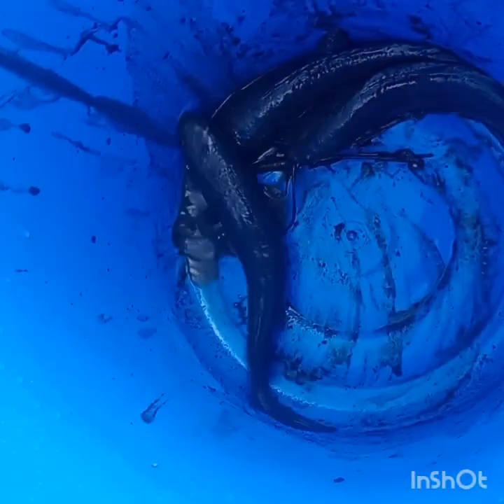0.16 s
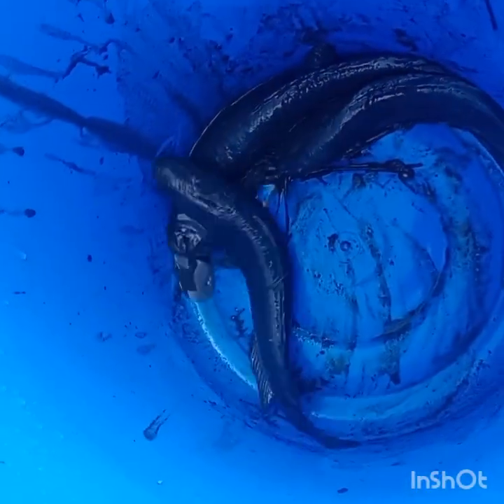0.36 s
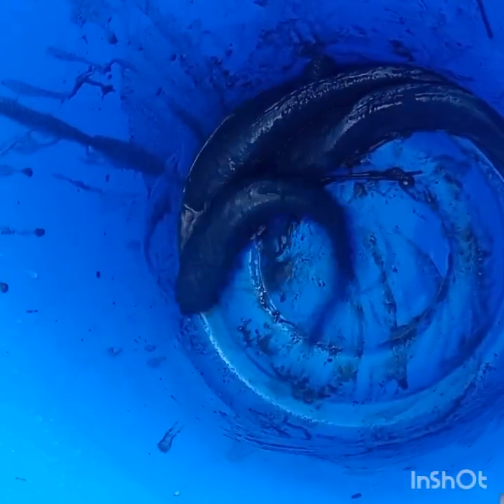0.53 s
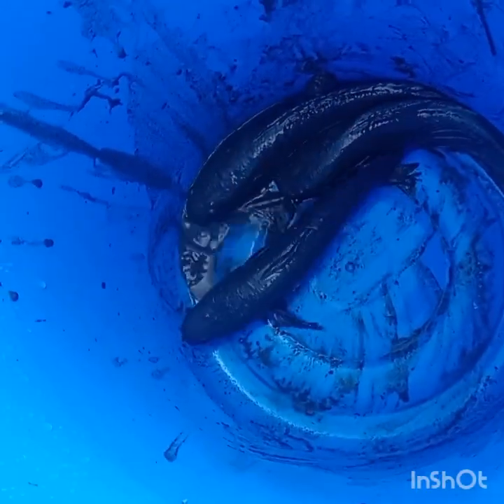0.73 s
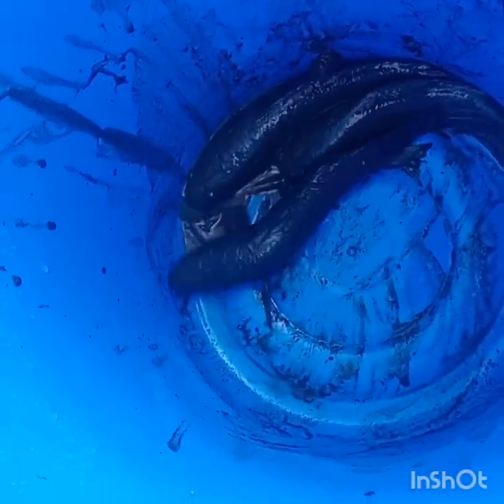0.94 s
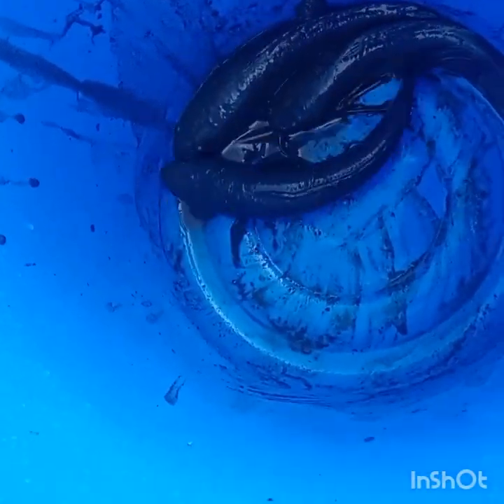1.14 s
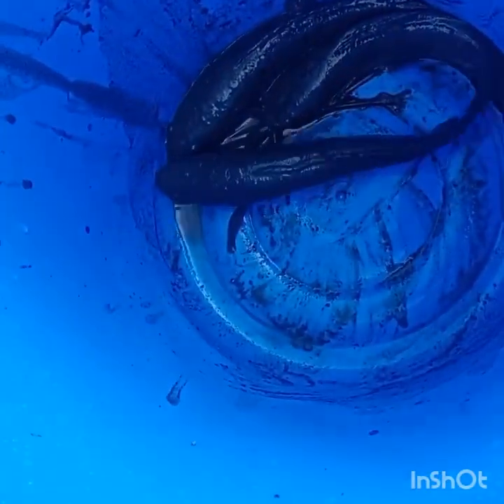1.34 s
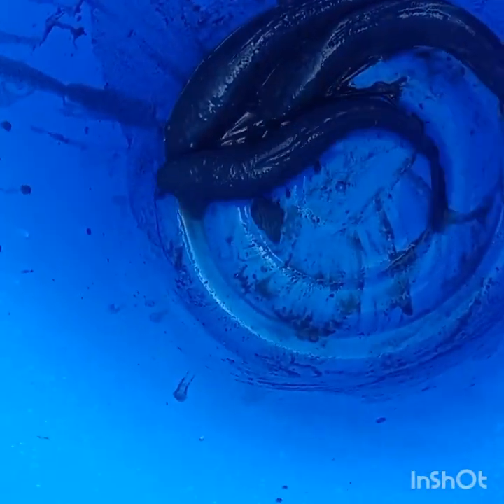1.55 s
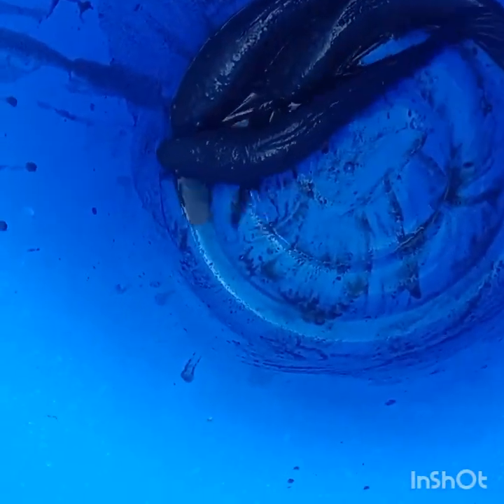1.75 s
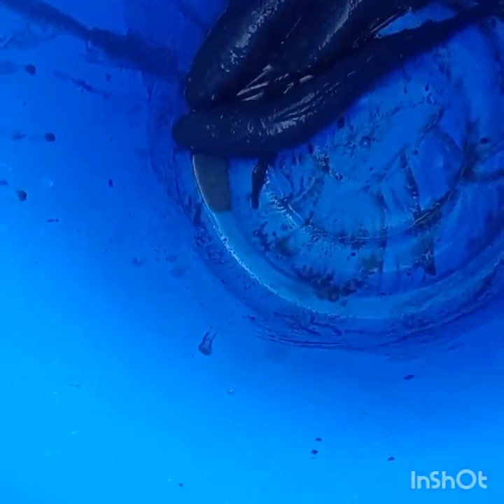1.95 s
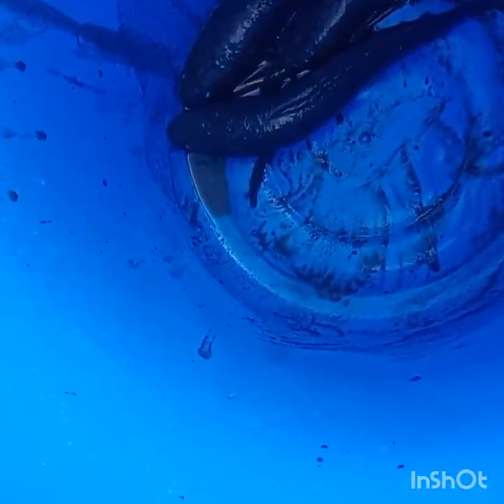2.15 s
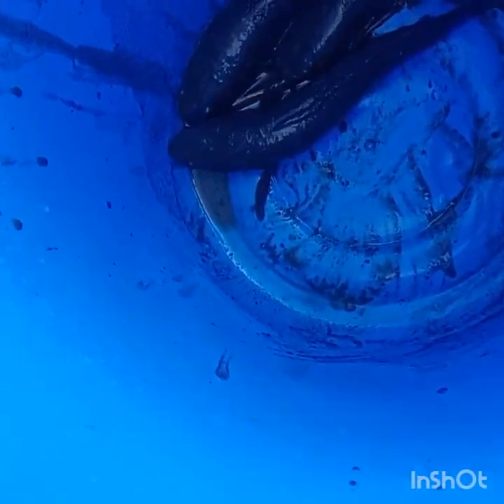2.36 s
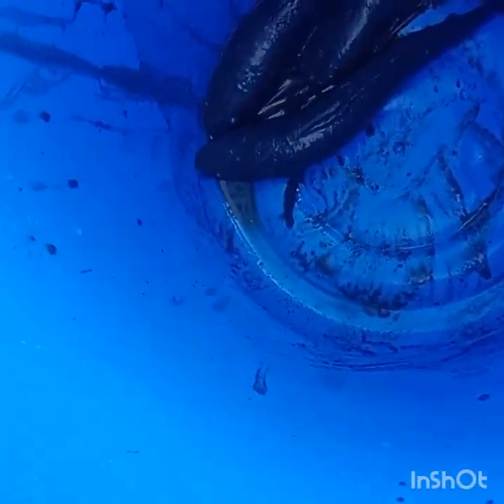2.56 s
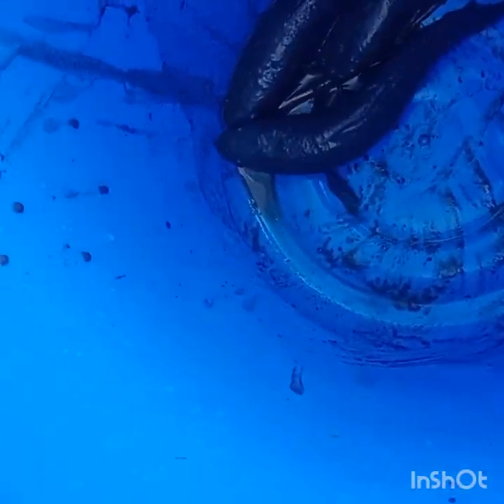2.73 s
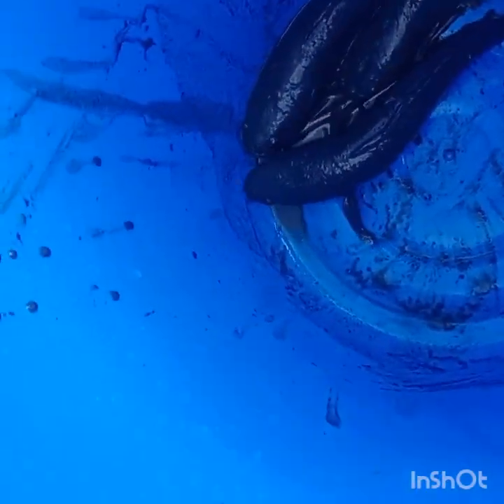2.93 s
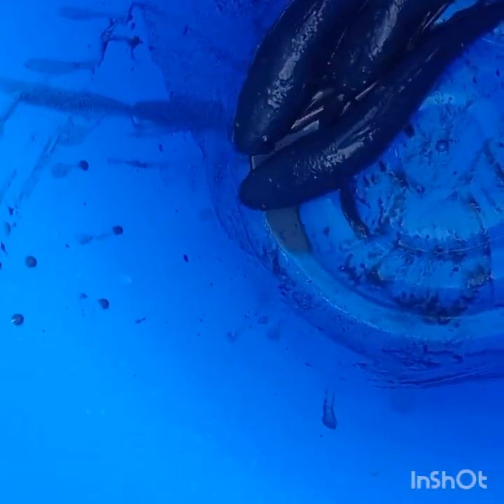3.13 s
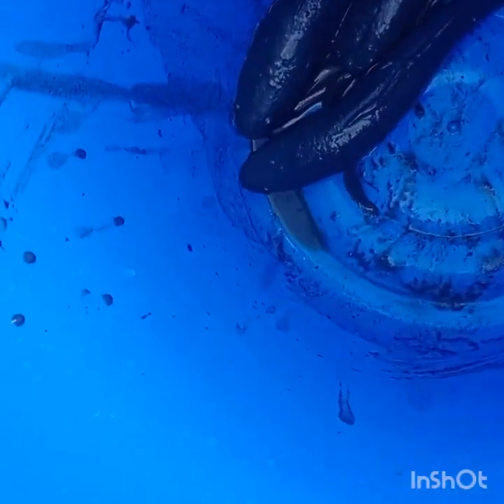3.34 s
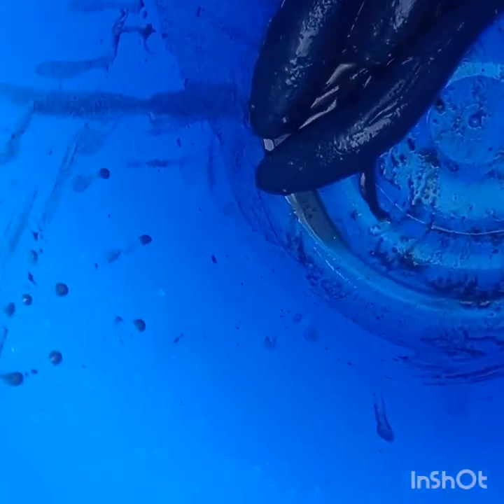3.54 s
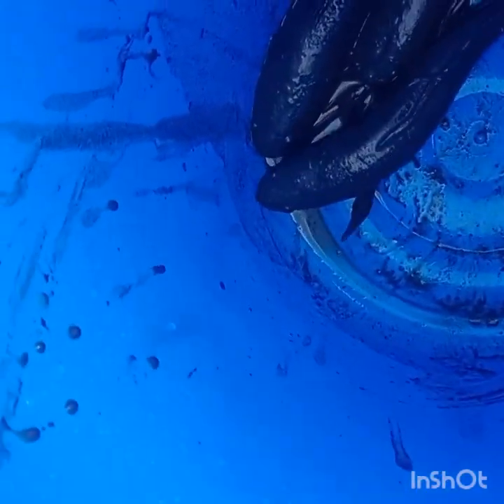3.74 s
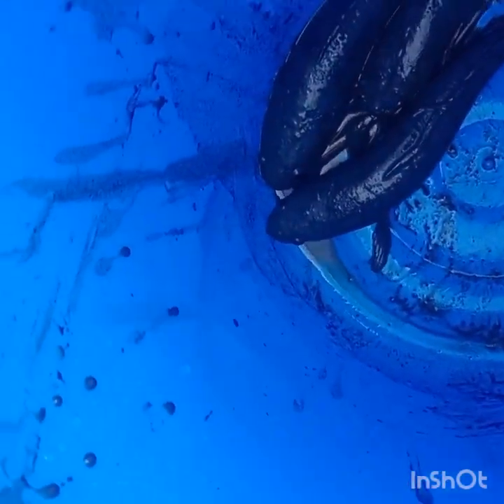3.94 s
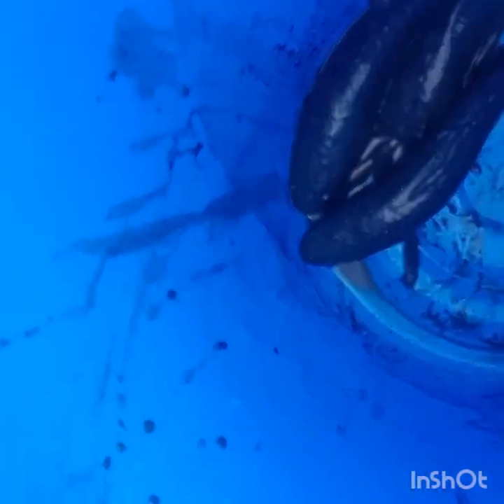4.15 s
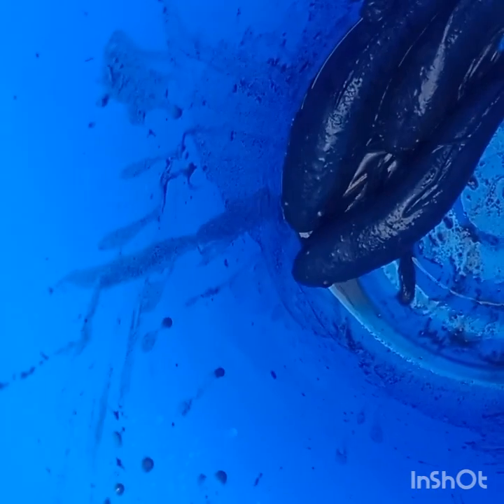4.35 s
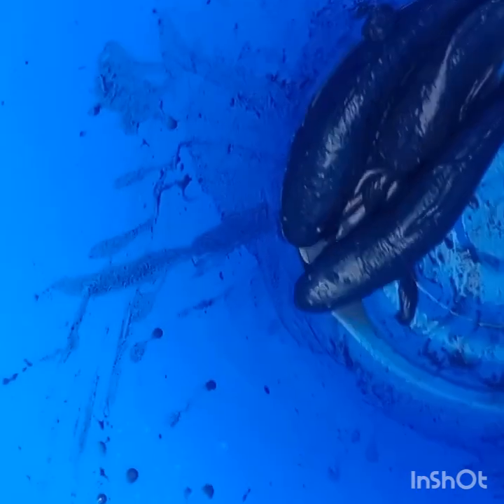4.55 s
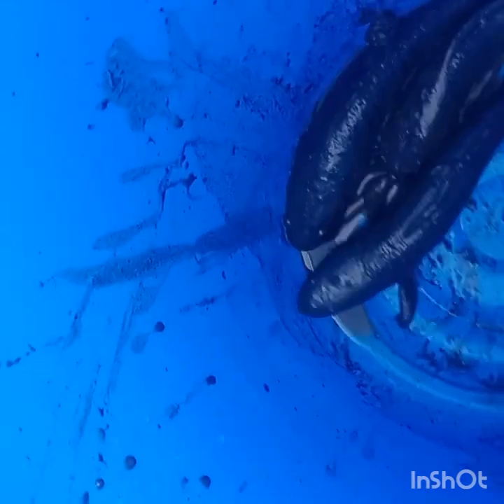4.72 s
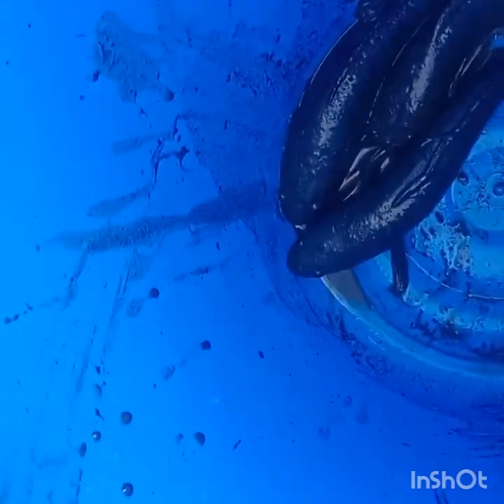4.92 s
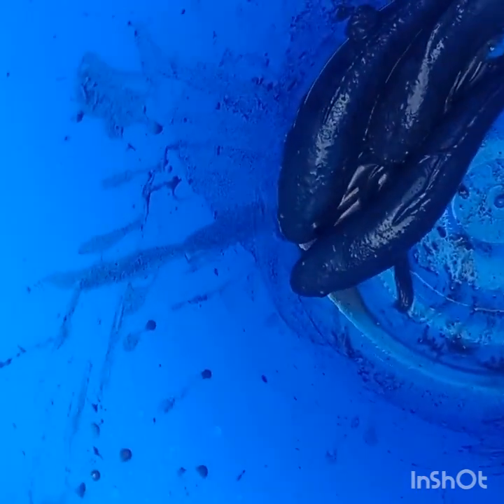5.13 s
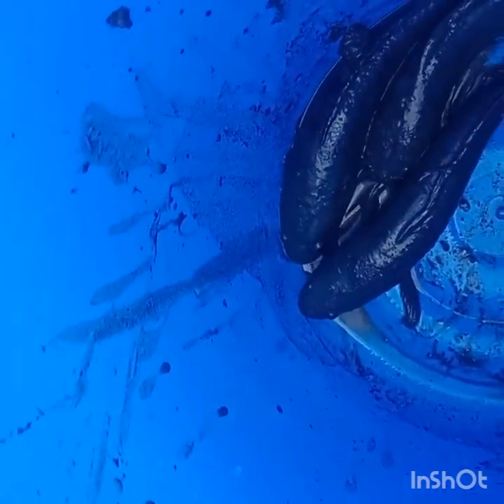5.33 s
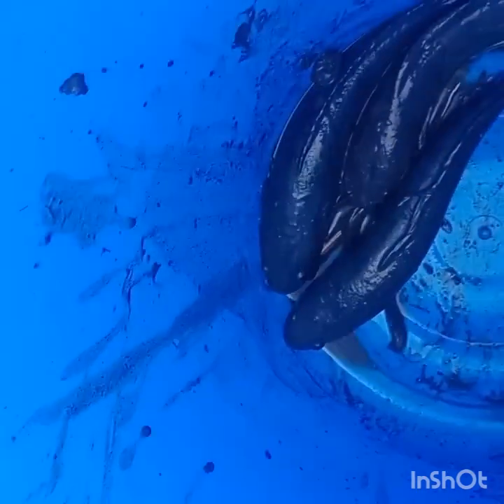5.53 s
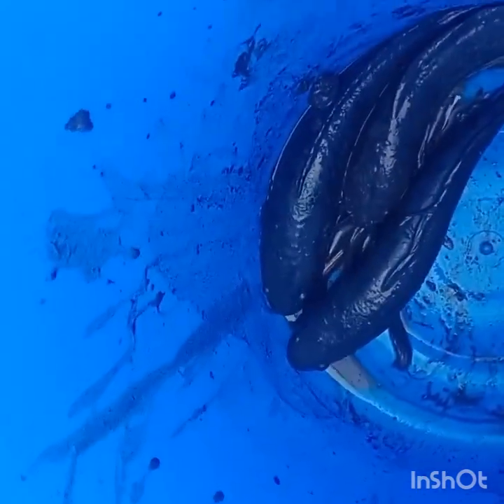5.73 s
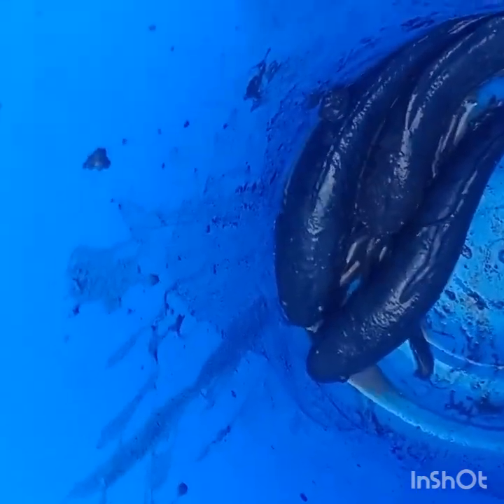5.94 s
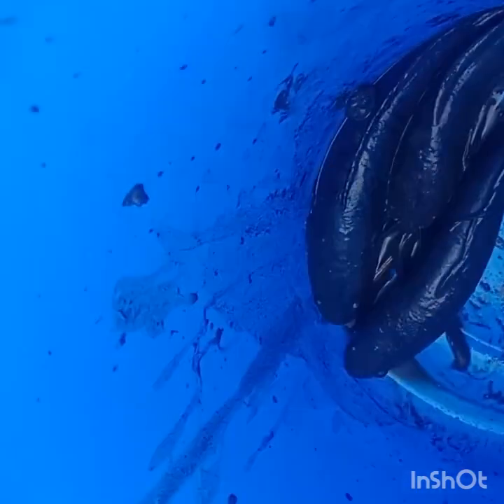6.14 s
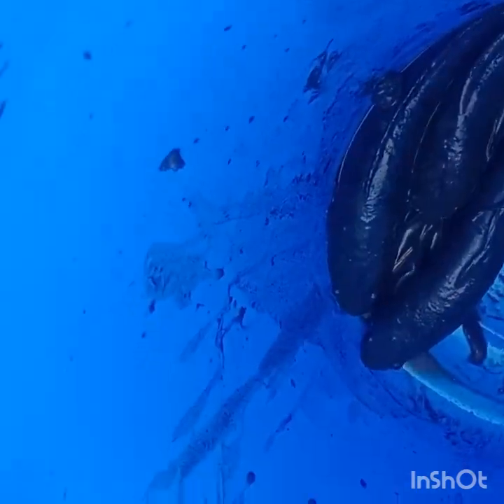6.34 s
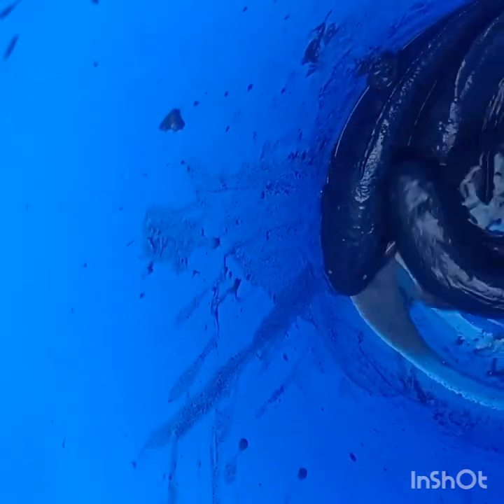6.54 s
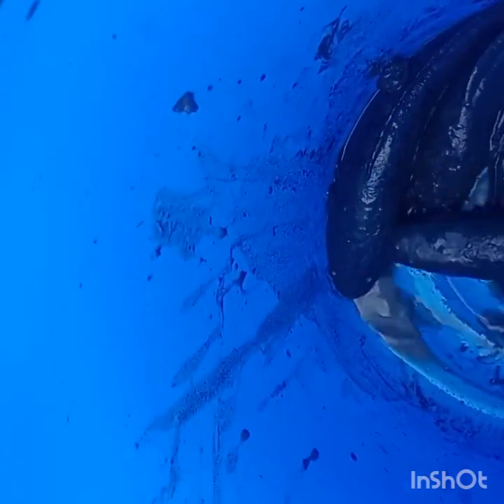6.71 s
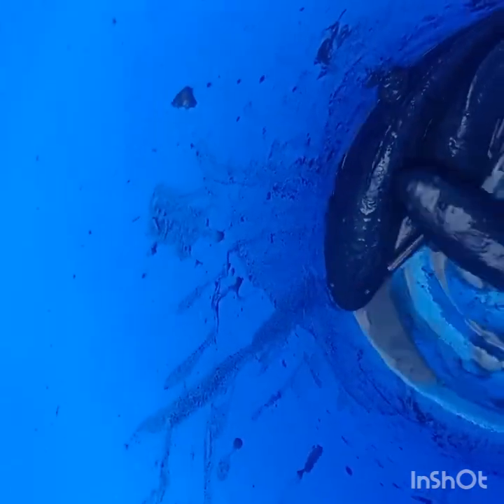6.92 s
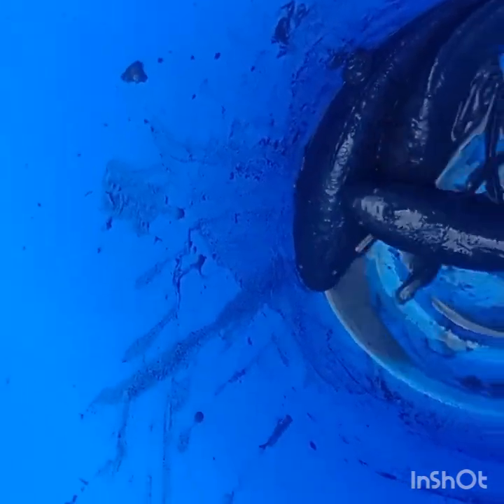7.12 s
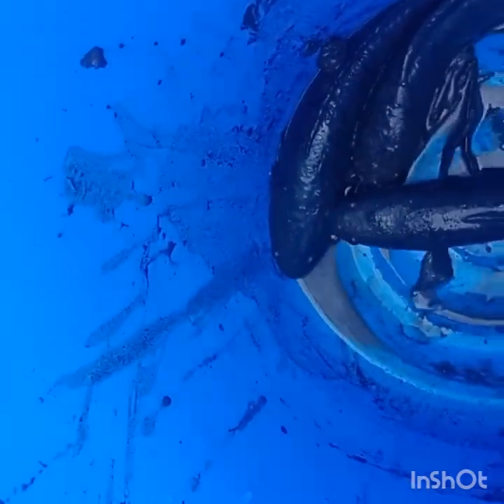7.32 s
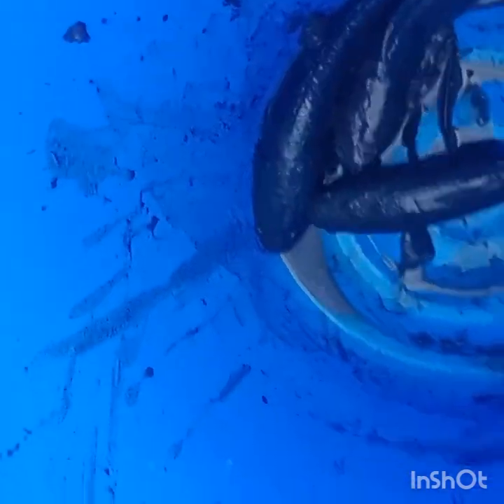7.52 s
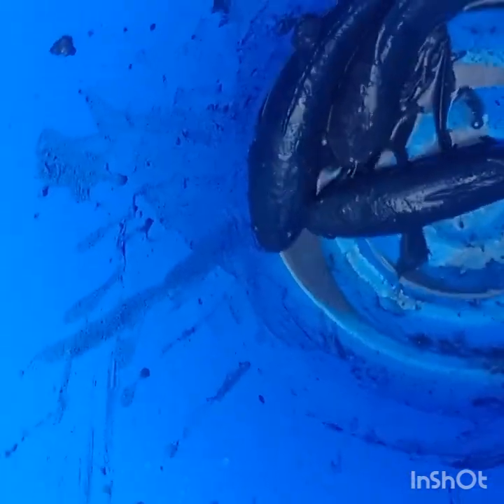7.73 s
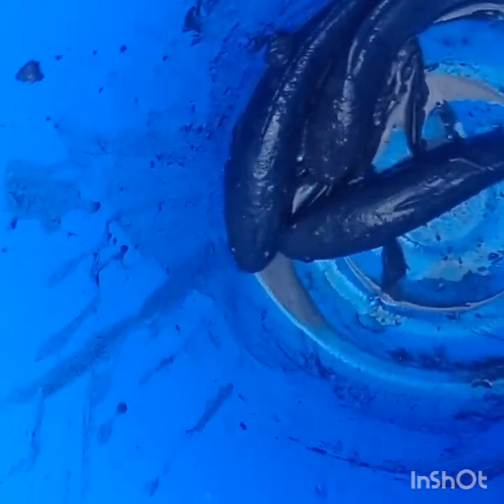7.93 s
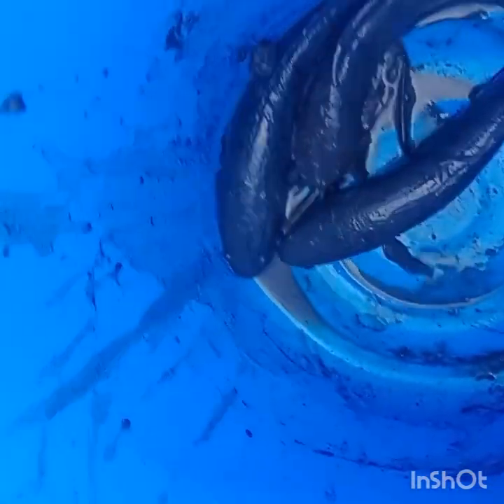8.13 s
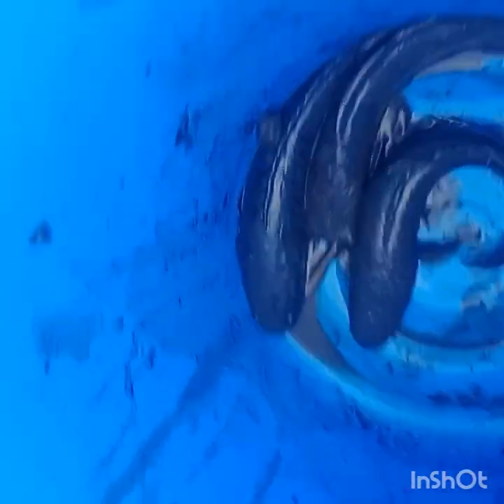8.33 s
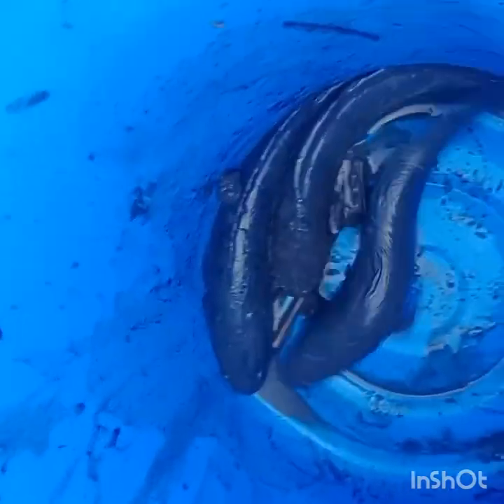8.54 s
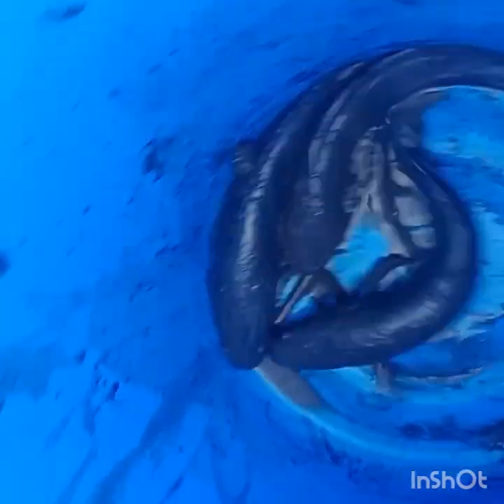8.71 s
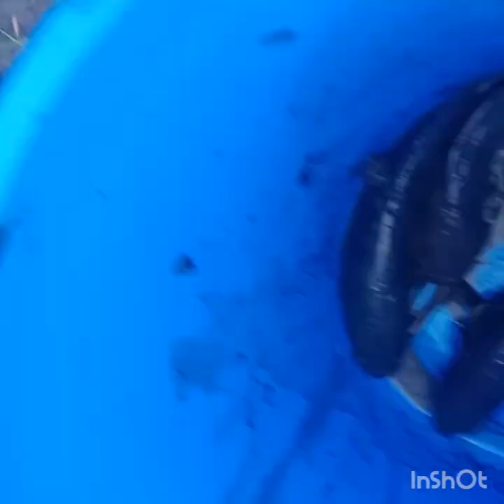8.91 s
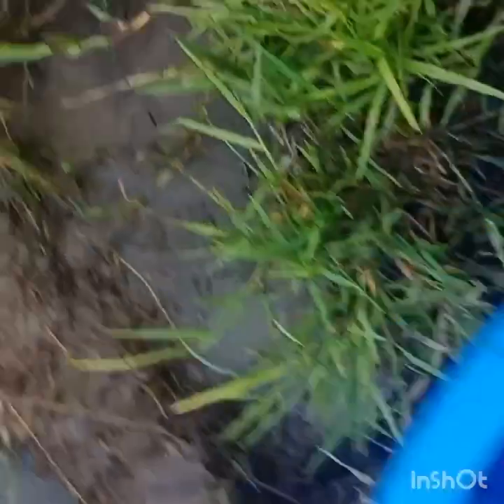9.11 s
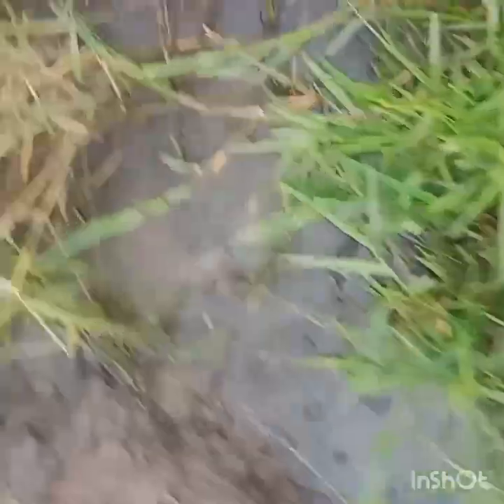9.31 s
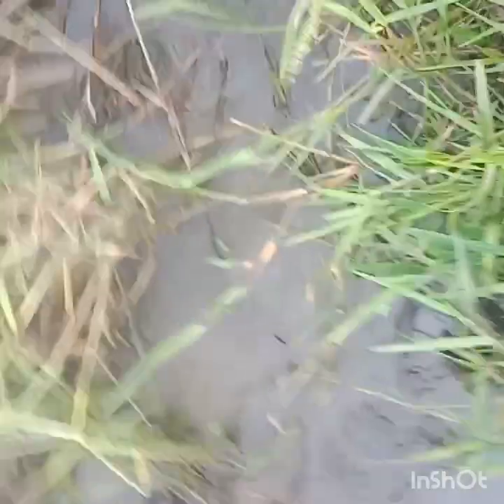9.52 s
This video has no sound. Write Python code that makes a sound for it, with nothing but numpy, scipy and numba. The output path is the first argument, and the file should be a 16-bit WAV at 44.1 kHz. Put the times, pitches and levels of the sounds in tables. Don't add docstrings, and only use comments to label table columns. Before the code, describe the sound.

Slimy fish slither in a thin film of water in a plastic basin, with wet squelches, sharp pops, tail slaps and soft thuds.

```python
import sys
import numpy as np
from scipy import signal
from scipy.fft import rfft, irfft, next_fast_len
from scipy.io import wavfile
from scipy.ndimage import uniform_filter1d
from numba import njit

SR = 44100
rng = np.random.default_rng(int(sys.argv[2]) if len(sys.argv) > 2 else 0)


def int16_out(signal):
    q = np.round(np.clip(np.atleast_2d(signal).T, -1, 1) * 32767)
    wavfile.write(sys.argv[1], SR, q.astype(np.int16))


def volts(x):
    e = np.asarray(x, float) / 20
    return 10 ** e


N = 426447
PORT_LAG_S = 0.00031


def colour_db(table, hz):
    f, db = np.transpose(table)
    return np.interp(np.log(hz + 1), np.log(f), db)


def noise(table, alike_hz, lag=0.):
    size = next_fast_len(N)
    hz = np.arange(size // 2 + 1) * SR / size
    mid, side = rfft(rng.standard_normal((2, size))) * volts(colour_db(table, hz))
    side = side * hz / np.hypot(hz, alike_hz)
    delay = np.exp(-2j * np.pi * hz * lag)
    x = irfft(np.array([mid + side, (mid - side) * delay]), size)[:, :N]
    return x / x.std()


def walk(rate):
    k = int(SR / rate)
    held = np.repeat(rng.standard_normal(N // k + 1), k)
    return 1.5 * uniform_filter1d(uniform_filter1d(held, k), k)[:N]


def band(x, hz, width, times=1):
    for _ in range(times):
        x = signal.lfilter(*signal.iirpeak(hz, hz / width, fs=SR), x)
    return x


def splat(t60, rise):
    t = np.arange(2400) / SR
    return rng.standard_normal(len(t)) * (1 - np.exp(-t / rise)) * volts(-60 * t / max(t60, .002))


@njit
def ring(rows):
    out = np.zeros((2, N))
    for s, hz, t60, rise, glide, left, right, lag in rows:
        start, late = int(s * SR), int(lag * SR)
        phase, step, fade, soft = 0., 2 * np.pi * hz / SR, 1., 1.
        damp, swell = np.exp(-np.log(1000) / (t60 * SR)), np.exp(-1 / (rise * SR))
        for i in range(int(t60 * SR)):
            v = np.sin(phase) * fade * (1 - soft)
            phase += step * (1 + glide * i / (t60 * SR))
            fade, soft = fade * damp, soft * swell
            if 0 <= start + i < N and 0 <= start + i + late < N:
                out[0, start + i] += left * v
                out[1, start + i + late] += right * v
    return out


def grains(s, hz, t60, rise, glide, db, pan_db, lag):
    rows = np.broadcast_arrays(s, np.clip(hz, 40, .4 * SR), np.clip(t60, .001, .3), np.clip(rise, 1e-4, .02),
                               glide, volts(db + pan_db / 2), volts(db - pan_db / 2), lag)
    return ring(np.ascontiguousarray(np.transpose(rows), float))


# [left_s, right_s]
WALL_ECHO_S = (.0028, .0013)
# [left_db, right_db]
WALL_ECHO_DB = (-4.5, -11)


def add(out, burst, s, db, pan_db):
    burst = burst * volts(db) / np.abs(burst).max()
    lags = (.0006, .0006 + PORT_LAG_S * np.tanh(pan_db / 4))
    for k, side in enumerate((0.42, -0.57)):
        for late, echo_db in ((0, 0), (WALL_ECHO_S[k], WALL_ECHO_DB[k])):
            at = max(int((s + lags[k] + late) * SR), 0)
            gain_db = side * pan_db / 2 + echo_db - 2.5
            out[k, at:at + len(burst)] += volts(gain_db) * burst[:N - at]


# [start_s, creep_db, legs_in_grass_db, left_minus_right_db]
CREEP = [(0, -57, -73, 10), (.75, -65, -71.5, 5.5), (1.1, -62, -66, 13), (1.6, -65.5, -72, 10.5),
         (2.2, -55, -72.5, 5), (2.8, -51.5, -67, 14), (3.5, -51.5, -67.5, 9), (4.6, -51.5, -67.5, 9),
         (5.1, -53, -66, 15), (5.8, -48.5, -68.5, 7.5), (6.05, -52.5, -64.5, 18.5), (6.5, -46, -69.5, -0.5),
         (7.05, -59.5, -66.5, 17), (7.44, -54, -62.5, 13.5), (7.75, -52.5, -67.5, 6.5),
         (8.24, -50.5, -63, 18.5), (8.6, -52, -68.5, 1.5), (9.67, -52.5, -65, 7.5)]


def creep():
    at, *controls = np.transpose(CREEP)
    return [np.interp(np.arange(N) / SR, at, c) for c in controls]


def moves(base_db, starts, lengths, levels_db):
    sag_db_per_s, release_db_per_s = -8, 323
    power = volts(2 * base_db)
    for s, length, db in zip(starts, lengths, levels_db):
        a = int(s * SR)
        u = np.arange(min(N - a, int((length + .25) * SR))) / SR
        fall_db = sag_db_per_s * u + release_db_per_s * np.maximum(u - length, 0)
        attack_s = 0.00066 + .06 * length
        power[a:a + len(u)] += volts(2 * (db - fall_db)) * (1 - np.exp(-u / attack_s)) ** 2
    return 10 * np.log10(power)


# [start_s, length_s, fizz_db, depth_db]
SQUEEZES = [(0, 0.048, -55, -13), (0.343, 0.059, -53.5, -6), (0.436, 0.16, -51, -12),
            (0.582, 0.15, -56, 1.5), (0.796, 0.31, -58.5, 4), (1.227, 0.027, -53, 0),
            (1.46, 0.095, -57.5, -22), (1.862, 0.041, -52, -7.5), (2.253, 0.015, -52, 5),
            (2.382, 0.059, -51.5, -16), (2.493, 0.047, -41, -2), (2.568, 0.14, -48, 1.5),
            (2.9, 0.16, -49.5, 1.5), (3.303, 0.022, -44, -25), (3.607, 0.19, -59.5, 10.5),
            (3.871, 0.15, -49, 2), (4.052, 0.27, -51, 1), (4.438, 0.066, -60.5, 13),
            (4.809, 0.035, -52, 11), (5.209, 0.062, -52, 4.5), (5.363, 0.15, -43.5, -6),
            (5.625, 0.097, -46.5, -13), (5.905, 0.13, -50, -25), (6.251, 0.18, -47, 3.5),
            (6.544, 0.061, -40.5, -2.5), (6.725, 0.064, -44.5, -7.5), (7.13, 0.37, -55.5, -28),
            (7.914, 0.21, -62, 10.5), (8.717, 0.035, -53.5, 6), (9.012, 0.16, -53.5, 2),
            (9.362, 0.21, -46, -15)]


def squeezes(creep_db):
    s, length, db, depth_db = np.transpose(SQUEEZES)
    fizz_db = moves(creep_db, s, length, db)
    slosh_db = moves(creep_db - 5, s, length, db + depth_db)
    return fizz_db, slosh_db


def slips(count, fade):
    kicks = np.zeros(N)
    kicks[rng.integers(0, N, count)] = rng.exponential(1, count)
    x = np.log(1.0 + signal.lfilter([1], [1, -np.exp(-1 / (fade * SR))], kicks))
    x = uniform_filter1d(x, size=40)
    x = x - uniform_filter1d(x, int(.09 * SR))
    return x / x.std()


def froth(table, level_db, pan_db, cycles, count):
    grain = .5
    u, g = rng.random((count, 3)).T, rng.standard_normal((count, 3)).T
    lo, hi = table[1][0], table[-2][0]
    hz, at = lo * (hi / lo) ** u[1], (u[0] * N).astype(int)
    db = colour_db(table, hz) + 10 * np.log10(hz) - 1.5 * np.log(u[2] + 0.013)
    life = cycles / hz * np.exp(0.65 * g[2])
    lag = PORT_LAG_S * (1 + 0.5 * g[1])
    bubbles = grains(u[0] * N / SR, hz, life, 0.029 * life, 0.023, db, pan_db[at] + 3 * g[0], lag)
    hiss = noise(table, 960, PORT_LAG_S) * volts(np.array([pan_db, -pan_db]) / 2)
    bubbles = np.sqrt(grain) * bubbles / bubbles.mean(0).std()
    hiss = np.sqrt(1 - grain) * hiss / hiss.mean(0).std()
    return volts(level_db) * (bubbles + hiss)


# [pitch_hz, level_db per Hz]
FIZZ = [(880, -8.5), (1500, -2), (1840, -5.5), (2480, 2.5), (2950, 0.5), (3450, -4.5), (4520, -12.5),
        (6570, -28), (9000, -36), (11700, -54), (19800, -120)]


def fizz(fizz_db, pan_db, grip_db, grass_db):
    x = froth(FIZZ, fizz_db - 1.8 + grip_db, pan_db, cycles=20.8, count=11000)
    sheen_db = grass_db + 72
    return x + (volts(sheen_db) - 1) * band(x, 4750, 4500, times=2)


# [pitch_hz, level_db per Hz]
SLOSH = [(180, -61), (300, -6), (357, -35), (531, -4.5), (669, -8), (730, -4), (919, 2), (1020, -1),
         (2000, -2.5), (2600, -16), (4400, -120)]


def slosh(slosh_db, pan_db, grip_db):
    return froth(SLOSH, slosh_db - 1.0 + 1.47 * grip_db, 0.14 * pan_db, cycles=32.5, count=2400)


def crackle(fizz_db, pan_db, count):
    u, g = rng.random((count, 2)).T, rng.standard_normal((count, 4)).T
    at = (u[0] * N).astype(int)
    db = fizz_db[at] - 6.5 - 3 * np.log(u[1] + 0.032)
    pops = np.zeros((2, N))
    for v in g[1:]:
        hz = 2500 * np.exp(0.239 * v)
        pops += grains(at / SR, hz, 0.013, 0.00014, 0.063, db, pan_db[at] + 3 * g[0], PORT_LAG_S)
    return pops


# [start_s, level_db, pitch_hz]
THUDS = [(0.624, -28.5, 234), (0.644, -23.5, 204), (1.111, -37, 187), (1.246, -33.5, 302),
         (2.812, -41, 151), (3.683, -40, 152), (3.819, -36, 227), (4.107, -37, 226), (4.273, -36, 170),
         (4.448, -36, 200), (5.378, -35, 261), (5.8, -30, 202), (6.424, -32, 166), (6.593, -34, 224),
         (6.661, -24.5, 135), (6.734, -14.5, 194), (7.43, -37.5, 234), (8.603, -32, 240), (8.666, -26, 122),
         (8.721, -29, 234), (8.987, -28, 219)]
# [start_s, level_db, pitch_hz]
MORE_THUDS = [(0.164, -39.5, 215), (0.21, -42, 181), (0.833, -41.5, 181), (1.615, -47, 160), (2.006, -46, 216),
              (2.258, -48, 240), (2.393, -40.5, 147), (3.172, -41.5, 194), (3.912, -38, 227), (4.159, -42, 226),
              (4.219, -40.5, 227), (4.293, -34.5, 196), (4.962, -41, 135), (5.237, -45, 195), (5.342, -42, 159),
              (5.519, -34, 224), (5.666, -40, 172), (6.299, -47, 220), (6.938, -37, 163), (7.654, -48, 220),
              (7.961, -40, 144), (8.117, -37.5, 225), (8.458, -41, 210), (8.846, -41, 145), (9.288, -40, 214)]
# [start_s, length_s, drumming_db]
ROLLS = [(0.148, 0.083, -48), (0.61, 0.094, -45), (0.814, 0.24, -46), (1.255, 0.019, -37),
         (1.618, 0.053, -62), (1.991, 0.038, -58), (2.363, 0.019, -51), (2.49, 0.15, -48.5),
         (3.132, 0.17, -60), (3.65, 0.12, -40), (3.807, 0.18, -45.5), (4.083, 0.28, -45.5),
         (4.416, 0.14, -45), (4.943, 0.056, -69), (5.315, 0.25, -40.5), (5.637, 0.25, -46.5),
         (6.225, 0.086, -42.5), (6.418, 0.22, -35.5), (6.68, 0.099, -35.5), (6.89, 0.21, -48),
         (7.404, 0.33, -49.5), (7.944, 0.17, -51), (8.563, 0.24, -40), (8.955, 0.11, -39.5),
         (9.272, 0.1, -47.5)]
# [pitch_hz, level_db per Hz]
BASIN = [(24, -70), (40, -34), (113, -6), (150, 1), (212, -1), (231, 3.5), (275, -18), (367, -16.5),
         (400, -16.5), (520, -47), (880, -120)]


def basin(creep_db, grip_db):
    s, db, hz = np.transpose(THUDS + MORE_THUDS)
    blows = band(grains(s - .0025, hz, 0.054, 0.005, -0.0086, db + 11.5, -2.3, 0.), 143, 250)
    drum_db = moves(creep_db - 0.5, *np.transpose(ROLLS)) - 6.5 + .6 * grip_db
    rumble = noise(BASIN, 1600) * volts(drum_db + 3.0 * walk(25))
    return blows + rumble * volts(np.array([[-1.2], [1.2]]))


# [pitch_hz, level_db per Hz]
FIELD = [(15, -39), (25, -41), (43, 1), (128, 7.5), (374, -8), (671, -8.5), (1350, -26), (3060, -16.5),
         (6600, -30), (8580, -90), (14500, -120)]


def field(grass_db):
    hum = noise(FIELD, 330) * volts(-56.5 + 2.1 * walk(2.78))
    grass = noise([(4500, 2.5), (7400, 8.5), (8600, 2.5), (15300, 2.0), (16000, -30)], 2400)
    grass = grass * volts(grass_db + 0.96 * walk(7.2))
    since_chirp = (np.arange(N) / SR - .005) % .196
    chirp = np.exp(-(since_chirp - .012) ** 2 / 0.0069 ** 2)
    insect = noise([(7100, -37), (7400, -2), (7650, -4), (7950, -44)], 3000)
    insect = insect * volts(-73.0 + 4.5 * walk(4.1)) * (chirp + 0.13)
    return hum + grass * volts(np.array([[1.5], [-1.5]])) + insect


# [start_s, level_db, pitch_hz]
SLIP_POPS = [(0.014, -33, 2200), (0.066, -36, 2680), (0.36, -29.5, 2160), (0.3854, -24, 2290),
             (0.425, -32, 2840), (0.449, -31, 2540), (0.469, -29.5, 2130), (0.4938, -26, 2160),
             (0.508, -33, 2320), (0.624, -31, 2970), (1.868, -36.5, 3000), (2.223, -37.5, 2630),
             (2.2553, -38, 2650), (2.386, -32, 2740), (2.5232, -18.5, 2760), (2.535, -25, 2850),
             (2.5524, -35, 2940), (2.5727, -42, 3010), (2.591, -27, 2960), (2.613, -28, 2430),
             (2.6324, -33, 2290), (2.6608, -27, 2500), (2.6814, -31, 2500), (2.7013, -26, 3150),
             (2.7227, -32, 2500), (2.743, -26, 2640), (2.8436, -27, 2000), (2.9717, -31, 3230),
             (2.9976, -32, 2440), (3.0227, -31, 2420), (3.3169, -25.5, 2990), (3.3496, -25, 2360),
             (3.5007, -28.5, 2380), (3.9634, -40, 1980), (4.071, -28, 2520), (4.129, -25, 2600),
             (4.1647, -23.5, 2490), (4.204, -27, 2300), (4.2264, -33, 2300), (4.2645, -30, 2300),
             (4.279, -24.5, 2290), (4.287, -27, 2270), (4.307, -30, 2410), (4.8202, -24, 1970),
             (4.86, -26, 2430), (5.081, -30, 2610), (5.24, -31, 2560), (5.4032, -17, 2780),
             (5.4173, -25, 3060), (5.4739, -34, 3180), (5.498, -22, 2450), (5.617, -26, 2940),
             (5.66, -22, 2850), (5.704, -25, 2700), (5.718, -28, 2860), (6.182, -27.5, 2640),
             (6.355, -22, 2600), (6.4002, -28, 2270), (6.4246, -33, 2300), (6.471, -33, 2870)]
# [start_s, level_db, pitch_hz]
LATE_POPS = [(6.643, -27.5, 2510), (6.7301, -30, 2710), (7.426, -41, 2630), (7.5547, -34, 2680),
             (7.7647, -32.5, 2950), (8.3692, -32, 1840), (8.4637, -36, 2400), (8.529, -29, 3170),
             (8.883, -33, 2580), (8.9524, -35, 2680), (9.0606, -35, 2670), (9.0718, -27, 2760),
             (9.117, -30, 2850), (9.374, -33, 3350), (9.438, -21, 2940), (9.4908, -29, 2700),
             (9.5248, -25, 2130)]


def slip_pops():
    out = np.zeros((2, N))
    for s, db, hz in SLIP_POPS + LATE_POPS:
        crack = splat(0.023, .0004)
        skin = band(band(crack, hz, 0.74 * hz), hz, 0.27 * hz)
        wall = band(band(crack, 1240, 500), 1660, 230)
        add(out, band(skin + volts(-0.5) * wall, 1760, 2300), s - .0005, db - 5.0, 11.)
    s, db, hz = np.transpose(SLIP_POPS + LATE_POPS)
    return out + grains(s, hz, 0.023, 0.0011, 0.044, db - 7.5, 16.0, PORT_LAG_S)


# [start_s, level_db, pitch_hz, ring_t60_s]
SIDE_SMACKS = [(0.1698, -33.5, 2680, 0.012), (0.312, -36, 2040, 0.065), (0.391, -24.5, 2200, 0.066),
               (0.598, -16.5, 2700, 0.0072), (0.8334, -27, 2590, 0.03), (1.235, -38, 1020, 0.027),
               (2.42, -27, 2600, 0.0036), (2.5058, -25, 2650, 0.0075), (2.7655, -26.5, 2580, 0.067),
               (2.9283, -30.5, 3050, 0.028), (3.46, -23.5, 2380, 0.024), (4.1385, -26, 2580, 0.01),
               (4.147, -23, 2460, 0.065), (4.5955, -33, 2970, 0.014), (5.3892, -22.5, 3170, 0.0068),
               (5.6376, -26, 2780, 0.033), (5.6897, -28, 2800, 0.019), (6.771, -22, 2800, 0.021),
               (6.7007, -25, 3480, 0.037), (7.5337, -22, 2530, 0.052), (7.5295, -30, 3850, 0.0078),
               (8.2288, -22.5, 2820, 0.0086), (9.1004, -28.5, 2670, 0.028), (9.5841, -21, 3100, 0.023)]
# [start_s, level_db, pitch_hz, ring_t60_s]
FRONT_SMACKS = [(0.042, -28, 2300, 0.013), (0.6943, -34.5, 1850, 0.0079), (1.178, -32.5, 2450, 0.016),
                (3.3036, -34, 3070, 0.076), (5.5514, -28.5, 2720, 0.019), (6.5995, -4, 3160, 0.019),
                (6.6892, -27, 2920, 0.023), (8.1195, -23.5, 1250, 0.041), (8.54, -28, 2100, 0.03),
                (8.661, -31, 1570, 0.022), (8.721, -23, 2300, 0.012), (9.0297, -11, 3480, 0.016),
                (9.2917, -20, 3140, 0.021), (9.4236, -24, 2960, 0.048), (9.5488, -22.5, 3470, 0.034)]


def smacks():
    out = np.zeros((2, N))
    muffle = signal.butter(4, 4400, fs=SR, output="sos")
    for table, pan_db in ((SIDE_SMACKS, 17), (FRONT_SMACKS, 1.1)):
        for s, db, hz, t60 in table:
            crack = splat(t60, .0004)
            body = band(band(crack, hz, 0.52 * hz), hz, 0.18 * hz)
            body += volts(-15) * band(crack, 1.03 * hz, 0.93 * hz, times=2)
            body += volts(-10.5 - .3 * (db + 23.5)) * band(crack, 1780, 2000)
            add(out, signal.sosfilt(muffle, body), s - .0005, db - 0.5, pan_db)
            snap_db = -51 - .3 * (db + 47)
            snap = band(band(crack, 7700, 2600), 6400, 2600, times=2)
            add(out, snap, s, db + snap_db, .5 * pan_db)
        s, db, hz, t60 = np.transpose(table)
        lag = PORT_LAG_S * np.tanh(pan_db / 4)
        out += grains(s, hz, 1.65 * t60, 0.00042, 0., db - 10.0, .5 * pan_db, lag)
    return out


# [start_s, level_db, pitch_hz]
BURPS = [(0.338, -43, 541), (1.234, -32, 496), (1.249, -32, 576), (2.667, -27, 878), (2.928, -35, 524),
         (3.169, -36.5, 650), (3.687, -35.5, 757), (3.751, -37, 643), (4.502, -38.5, 513),
         (6.032, -30.5, 798), (7.34, -37, 766), (7.476, -35.5, 430), (7.469, -38, 700), (8.117, -23.5, 884),
         (8.57, -37.5, 820), (8.663, -30, 790), (2.015, -43, 606), (8.12, -36.5, 556), (8.665, -33, 364),
         (8.851, -44, 740), (8.852, -40.5, 318), (8.945, -52, 420), (9.512, -33.5, 850),
         (9.583, -31.5, 752)]
# [start_s, level_db, pitch_hz]
BLIPS = [(0.315, -26.5, 980), (0.399, -29.5, 973), (0.883, -31, 1037), (2.402, -31, 1610),
         (2.511, -24, 1500), (2.73, -34.5, 1110), (3.482, -32.5, 1475), (3.917, -30, 923),
         (5.217, -39, 920), (5.49, -36, 900), (5.552, -29, 1365), (5.963, -33, 1670), (5.979, -26.5, 1420),
         (6, -29.5, 1060), (6.146, -33.5, 1090), (6.264, -27.5, 1490), (7.977, -31, 950),
         (8.067, -29, 1420), (8.543, -33, 1037), (8.719, -24.5, 1243), (8.943, -35, 1006),
         (9.046, -26, 1680), (9.102, -27, 1280), (9.53, -27.5, 1460)]
# [start_s, level_db, pitch_hz]
DRIPS = [(0.4175, -31, 1790), (0.5297, -32.5, 2270), (1.3503, -39.5, 2160), (1.4755, -40, 3460),
         (1.522, -41, 2700), (1.841, -37, 1580), (2.161, -41, 2650), (2.2576, -44, 1490),
         (2.197, -38, 1160), (2.281, -42, 1450), (4.865, -38, 1340), (5.682, -41, 2800),
         (9.511, -30.5, 1560)]


def gurgles():
    out = np.zeros((2, N))
    for s, db, hz in BURPS + BLIPS + DRIPS:
        shake = band(splat(3.26 / np.sqrt(hz), 0.00011), 0.87 * hz, 2.5 * hz)
        add(out, band(shake, hz, .35 * hz), s - .001, db - 4, 2.5)
    s, db, hz = np.transpose(BURPS + BLIPS + DRIPS)
    return out + grains(s, hz, 1.63 / np.sqrt(hz), 0.00089, 0.013, db - 1.5, 9.7, PORT_LAG_S)


# [start_s, level_db, first_pitch_hz, last_pitch_hz, length_s]
WARBLES = [(0.316, -40.5, 568, 550, 0.033), (0.364, -43.5, 555, 610, 0.054),
           (0.325, -53, 3450, 3500, 0.033), (0.499, -50, 610, 790, 0.015), (1.235, -49, 900, 1000, .02),
           (2.666, -36, 797, 1260, 0.025), (2.758, -38.5, 1100, 1310, 0.022), (3.863, -36, 900, 930, 0.036),
           (3.98, -37.5, 870, 850, 0.042), (4.834, -52, 1020, 890, 0.029), (6.461, -32, 200, 215, 0.039),
           (6.487, -27.5, 219.5, 222, 0.048), (6.525, -31, 237, 267, 0.037),
           (8.574, -37, 1056, 1260, 0.037), (8.603, -43.5, 1200, 960, .035), (8.852, -47, 312, 460, 0.031),
           (8.931, -43.5, 376, 620, 0.047), (8.944, -44, 895, 1350, 0.024), (9.553, -38, 970, 1020, 0.023)]


def warbles():
    out = np.zeros((2, N))
    for s, db, first_hz, last_hz, length in WARBLES:
        u = np.linspace(0, 1, int(length * 1.4 * SR))
        hz = first_hz + (last_hz - first_hz) * u * 1.4
        tone = np.sin(2 * np.pi * np.cumsum(hz) / SR)
        add(out, tone * np.sqrt(u) * (1 - u) ** 2.0, s, db, 6.5 * np.tanh(first_hz / 500 - 1))
    return out


# [start_s, level_db, top_db]
TICKS = [
    (0.593, -29, -27),
    (1.1043, -26.5, -30),
    (2.507, -37, -30),
    (3.721, -32.5, -30),
    (6.5405, -32, -28),
    (6.772, -26, -9.5),
    (7.5006, -32.5, -30),
    (9.019, -34, -15),
]
# [start_s, level_db]
SPITS = [(2.5063, -34), (3.3024, -44), (3.963, -38), (5.39, -33), (5.4181, -33), (5.497, -43), (5.551, -48),
         (5.6555, -50), (6.5994, -19.5), (6.7706, -34), (8.3945, -37), (8.541, -35), (8.7212, -31.5),
         (8.8323, -46), (9.0322, -33), (9.4898, -37)]


def droplets():
    out = np.zeros((2, N))
    for s, db, top_db in TICKS:
        crack = splat(0.02, 0.00087)
        add(out, band(band(crack, 2800, 4870), 2800, 4900), s, db - 3.0, 2.5)
        add(out, band(crack, 10600, 5000, times=2), s, db + top_db + 2.5, 4.)
    for s, db in SPITS:
        spray = band(band(splat(0.012, 0.00015), 4700, 1550), 4400, 2000)
        add(out, spray, s - .001, db, 3.)
    return out


# [pitch_hz, width_hz, level_db]
WALL = [(480, 51, -7), (740, 6.7, 5.5), (912, 12, 0), (1490, 11.4, -5), (2380, 2700, -9.5)]


def wall_ring(wet):
    return volts(-2.0) * sum(volts(db) * band(wet, hz, width) for hz, width, db in WALL)


def scene():
    creep_db, grass_db, pan_db = creep()
    fizz_db, slosh_db = squeezes(creep_db)
    grip_db = 1.5 * slips(count=640, fade=0.022)
    wet = fizz(fizz_db, pan_db, grip_db, grass_db) + slosh(slosh_db, pan_db, grip_db)
    wet = wet + crackle(fizz_db, pan_db, count=700)
    wet = wet + slip_pops() + smacks() + gurgles() + warbles() + droplets()
    return wet + wall_ring(wet) + basin(creep_db, grip_db) + field(grass_db + 0.069 * grip_db)


def roll_off(x):
    return signal.sosfilt(signal.butter(12, 16510, fs=SR, output="sos"), x)


def record(dry):
    x = signal.sosfilt(signal.ellip(8, .3, 30, 15600, fs=SR, output="sos"), dry)
    x = signal.sosfilt(signal.butter(2, 60, "high", fs=SR, output="sos"), x)
    z = signal.stft(x, nperseg=2048)[2]
    treble = z[:, 320:760]
    power = (np.abs(treble) ** 2).reshape(2, 44, 10, -1).sum((0, 2))
    power = np.log(np.repeat(power, 10, axis=0) + 1e-20)
    usual = uniform_filter1d(signal.medfilt2d(power, (1, 7)), size=31, axis=0)
    z[:, 320:760] = treble * np.where(power < usual - .2, .03, 1)
    mix = signal.istft(z, nperseg=2048)[1][:, :N]
    return roll_off(mix)


dry = scene()
out = record(dry)
int16_out(out)
```